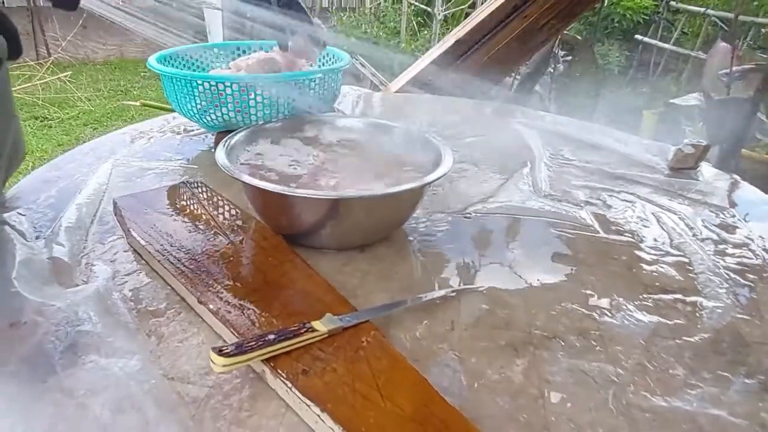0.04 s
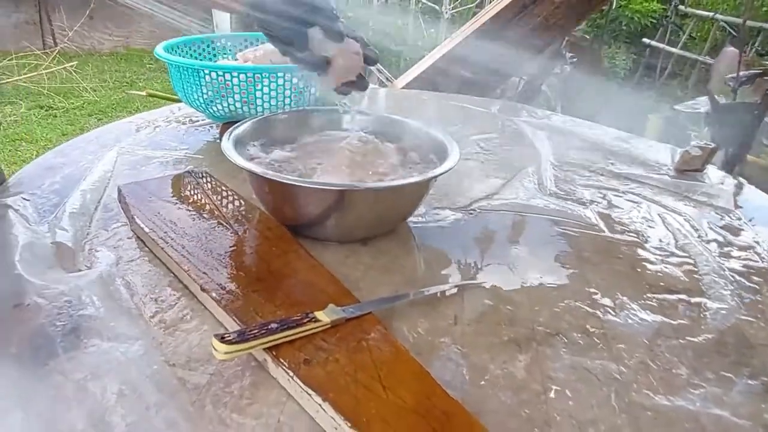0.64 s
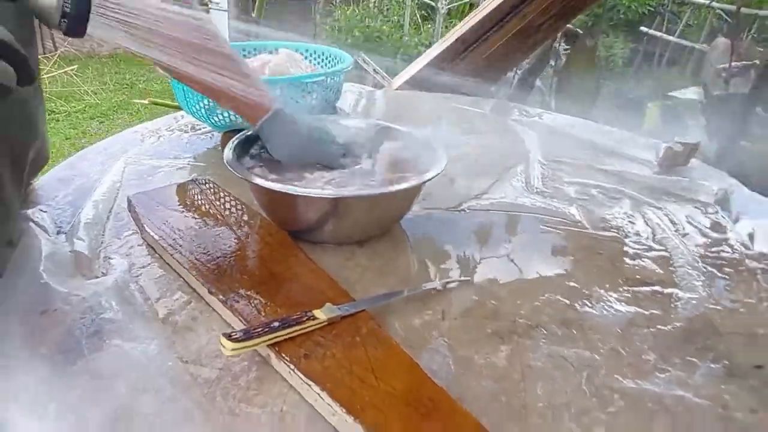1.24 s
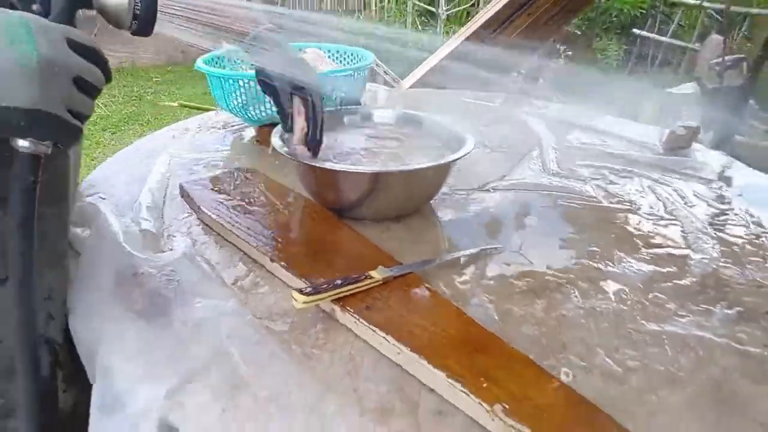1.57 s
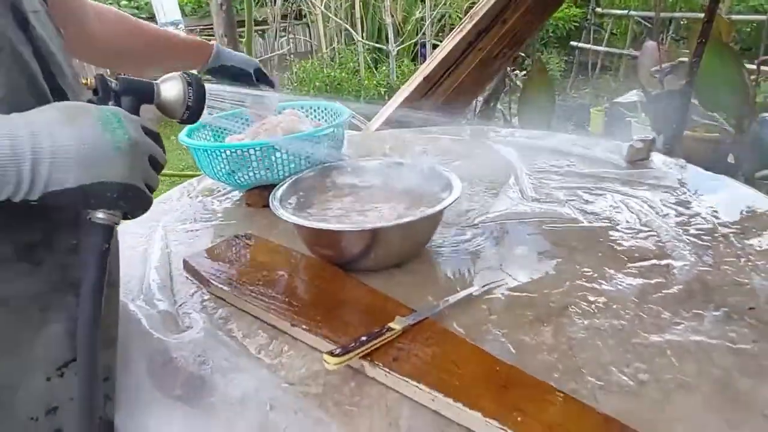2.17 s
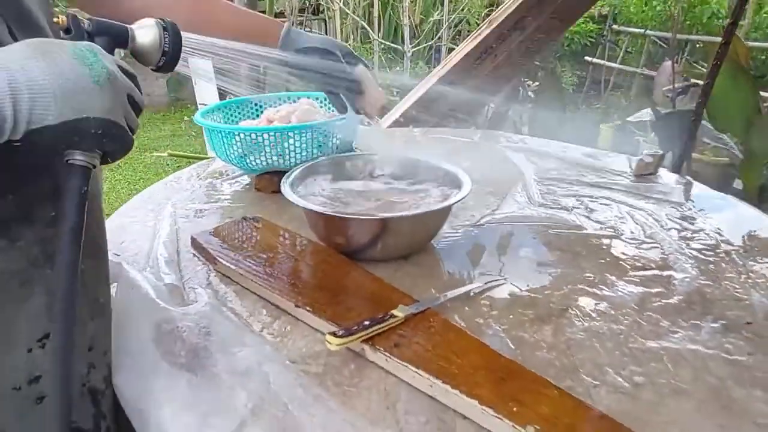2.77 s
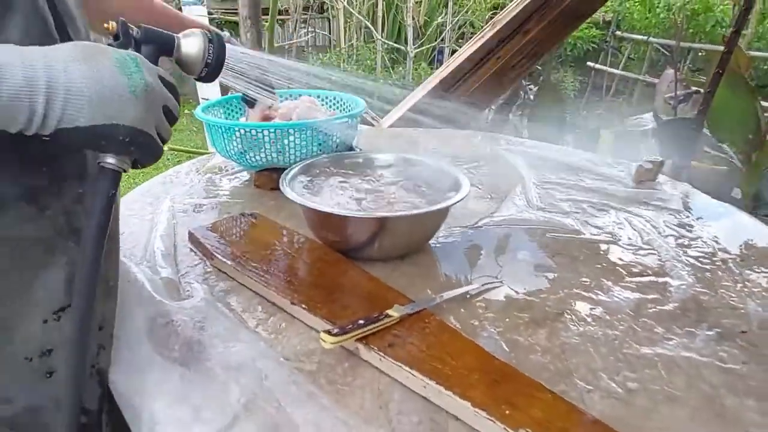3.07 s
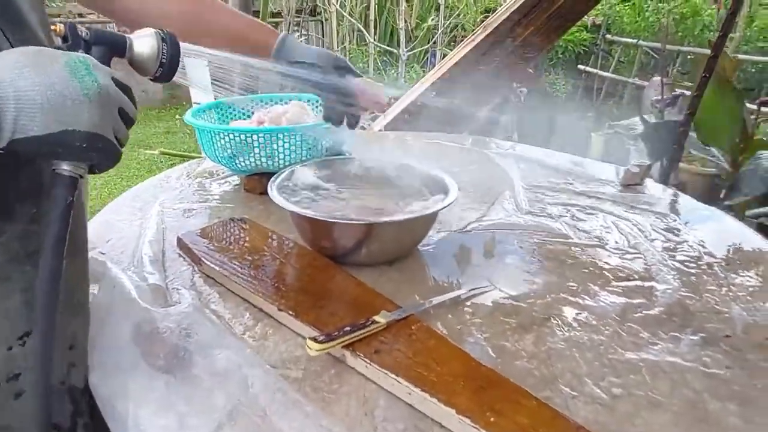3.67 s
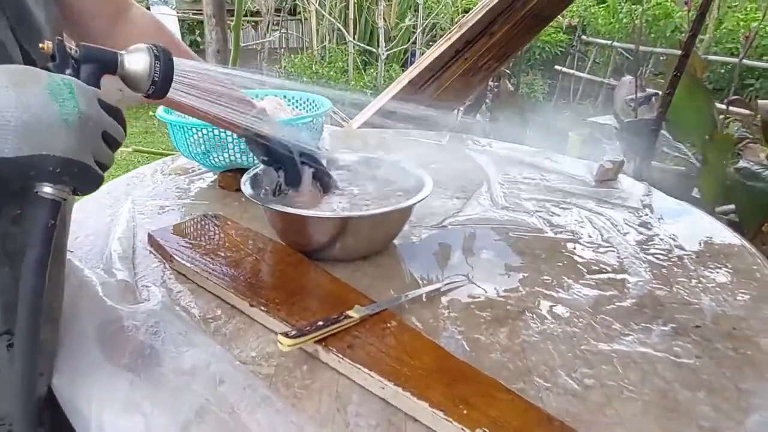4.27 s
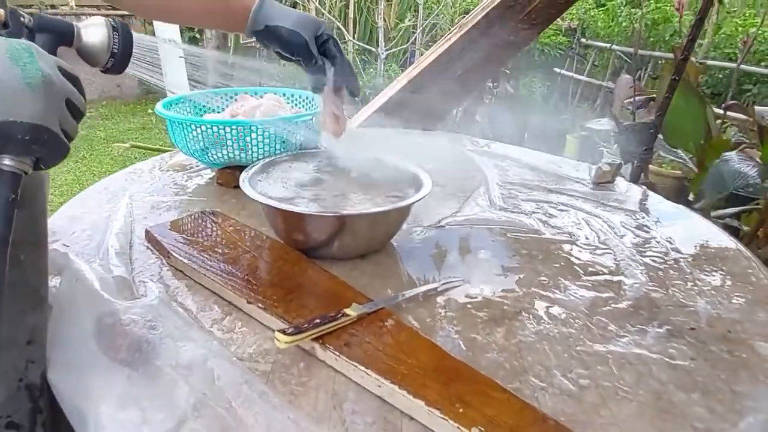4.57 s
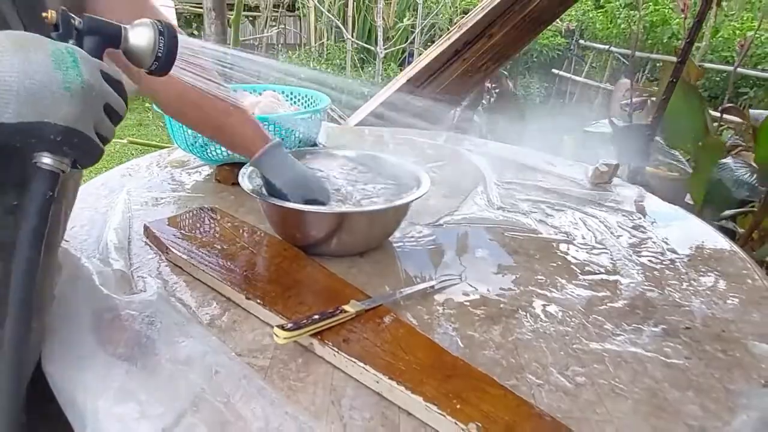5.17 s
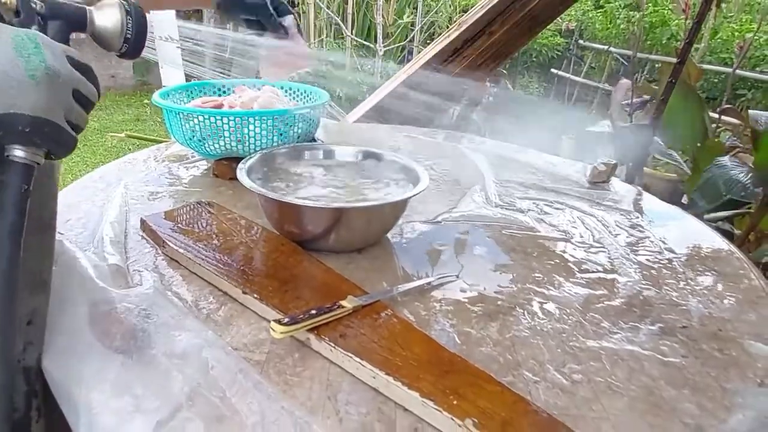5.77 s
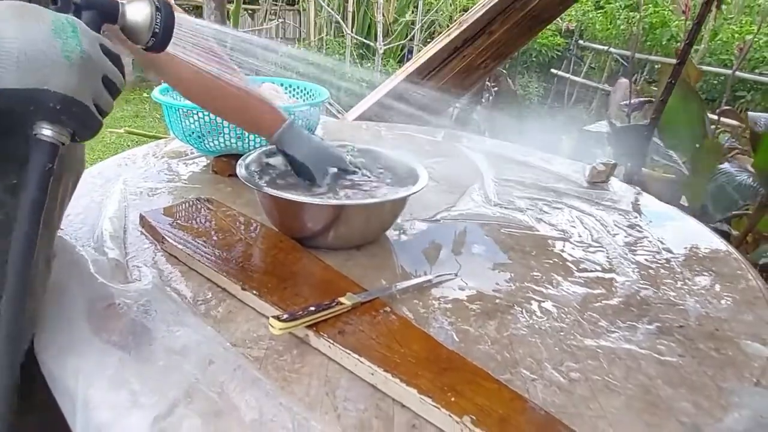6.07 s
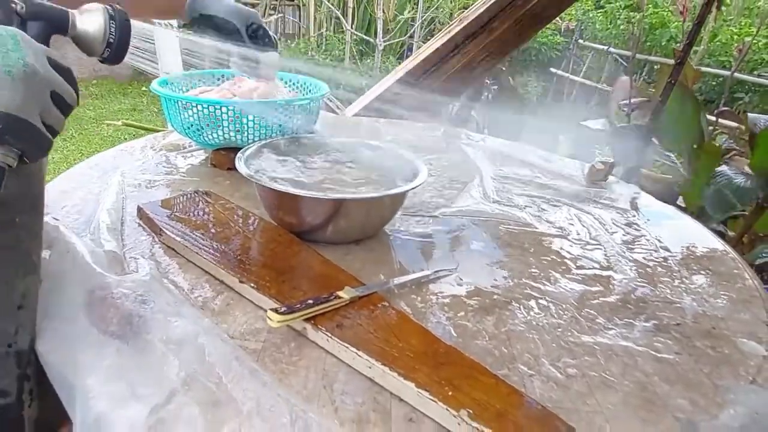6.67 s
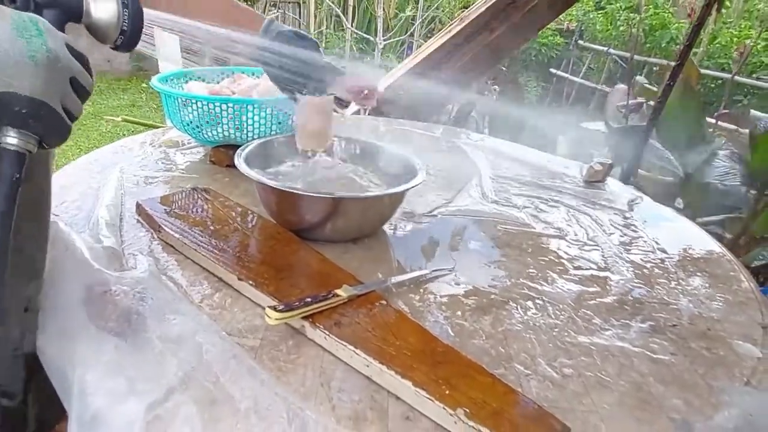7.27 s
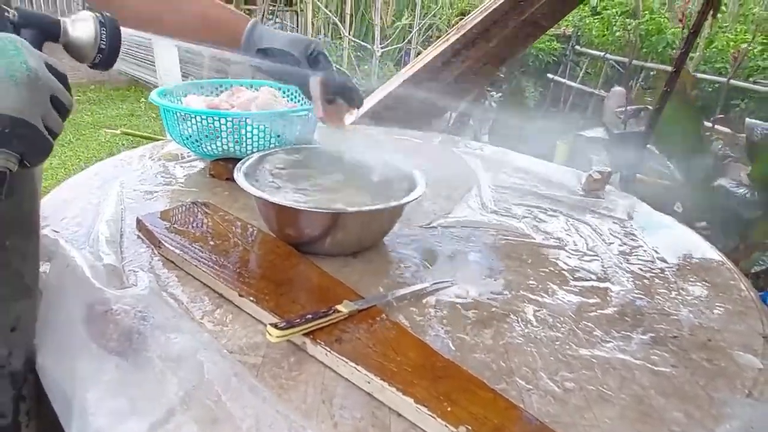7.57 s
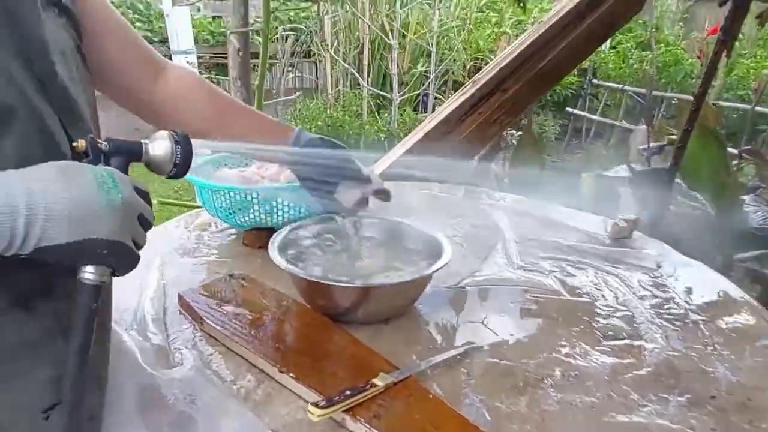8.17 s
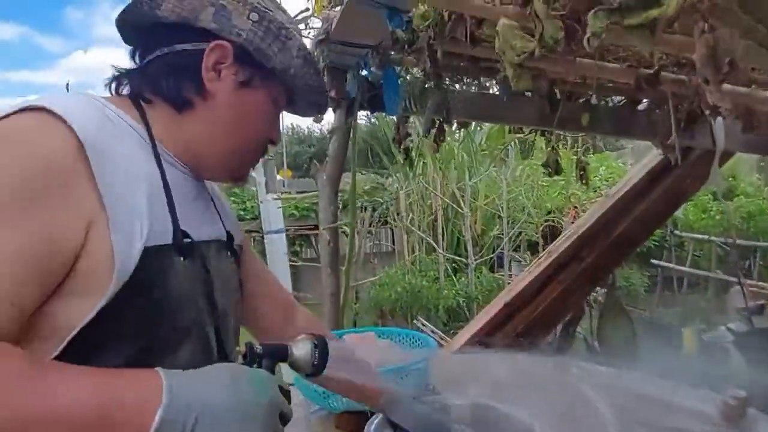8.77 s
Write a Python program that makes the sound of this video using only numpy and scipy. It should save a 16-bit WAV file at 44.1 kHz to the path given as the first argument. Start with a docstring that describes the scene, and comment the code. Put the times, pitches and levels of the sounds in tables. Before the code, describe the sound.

A garden hose sprays without a break onto a wet outdoor table and a steel bowl of water, drumming, splattering and hissing close by. About once a second a gloved hand dips into the bowl with a bubbly slosh, then holds a fish fillet in the jet, so the drumming drops and a fine mist remains. The bowl rings faintly and gulps. Wind gusts buffet the microphone, with a last rumble near the end.

```python
"""From the start, a garden hose drums on a wet outdoor table and splatters in the film of water.
Soon a gloved hand dips into a steel bowl, sloshing up bubbles, then rinses a fish fillet in the jet:
the drumming drops and fine mist is left. This repeats about once a second while the bowl rings and
gulps and gusts buffet the two microphone ports (its openings). Near the end the microphone tilts
away, dulling the finest hiss, as a last gust rumbles."""
import sys
import numpy as np
from scipy import signal
from scipy.fft import rfft, irfft, next_fast_len
from scipy.io import wavfile

SR = 44100
rng = np.random.default_rng(int(sys.argv[2]) if len(sys.argv) > 2 else 0)


def digitize_waveform(pressure):
    """Quantize a signal to 16-bit integers and store it at the path in sys.argv[1].

    Rows of a 2-D input are taken as channels; values are limited to [-1, 1].
    """
    field = np.atleast_2d(pressure).T
    bounded = np.clip(field, -1, 1)
    quanta = np.round(bounded * 32767).astype(np.int16)
    wavfile.write(sys.argv[1], SR, quanta)


N = 398663

# Levels in the tables are relative. "Side" is left minus right: above 0 leans left.
# the free jet as the nozzle wanders over the table: t/s, drumming/dB, splatter/dB, mist/dB
FREE_JET = [(0, -40.5, -35.5, -39.5), (.28, -39.5, -35, -45), (.53, -43, -38.5, -44),
            (1.05, -43, -34, -37.5), (1.4, -44, -38.5, -39), (2.1, -41.5, -33.5, -38),
            (2.6, -43.5, -39.5, -46), (3.2, -44, -37, -42.5), (3.9, -43, -36.5, -38),
            (4.59, -44.5, -38.5, -38.5), (5.17, -41.5, -39, -39.5), (5.6, -43, -35.5, -44),
            (6.0, -43, -38, -40.5), (6.75, -40.5, -38.5, -40), (6.95, -45, -38, -44),
            (7.78, -42, -37, -41.5), (8.5, -42.5, -35.5, -44.5), (9.04, -49.5, -37, -42)]
# the hand holds a fillet in the jet: t in/s, t out/s, time to clear/s, drumming lost/dB,
# splatter lost/dB, mist gained/dB, lull in the mist just before/dB
FILLET_RINSES = [(0.516, 0.817, .02, 6.5, 2.5, 1, -1), (1.134, 1.232, 0.049, 5.5, -0.5, 0, 0),
                 (1.613, 1.92, 0.034, 7.5, 1.5, 1.5, 8), (2.58, 2.9, 0.022, 8.5, 2, 3.5, -2),
                 (3.477, 3.744, 0.11, 9, 2.5, 3, 8), (4.31, 4.725, 0.1, 7.5, 2, 1, -2),
                 (5.28, 5.672, 0.12, 9.5, 5.5, 3.5, 0.5), (6.247, 6.58, 0.19, 11, 0.5, 3.5, 4),
                 (7.11, 7.624, 0.48, 4.5, 1.5, 1.5, -4), (8.127, 8.476, 0.28, 9.5, 3.5, 3.5, -1)]
# the jet falls squarely into the bowl: t/s, length/s, drumming gained/dB, splatter gained/dB
JET_SURGES = [(.05, 0.044, 1.5, 0), (.27, .04, 1, 0.5), (0.863, 0.058, 0.5, 1.5), (1.113, 0.036, 2.5, 3),
              (1.31, 0.13, 1, 3.5), (1.54, .06, 3, -2), (2.127, .06, -1.5, 0), (2.33, 0.046, 1.5, -1),
              (2.423, 0.071, 1.5, 2), (3.064, .14, 1.5, 3.5), (3.41, 0.083, 1.5, -1.5),
              (3.863, .05, 2, 0.5), (4.03, .05, -1, 2.5), (4.252, 0.07, 5.5, 1.5), (4.87, 0.11, -0.5, 4.5),
              (5.06, 0.065, 1, 3.5), (5.136, 0.074, 2.5, 2.5), (5.834, .08, 4.5, 2), (5.906, .04, 5, 2),
              (6.004, 0.082, 5.5, 1), (6.68, 0.053, 0.5, 2.5), (7.77, .1, 2, 5.5), (8.045, .06, 1, -3),
              (8.832, 0.074, 3, 3)]
# the jet catches glove or fillet squarely and spits mist: t/s, length/s, level/dB
MIST_SPITS = [(.27, .08, -38.5), (.6, 0.06, -38), (0.782, 0.068, -38.5), (2.403, .07, -38),
              (2.99, .06, -41), (3.273, .08, -37.5), (3.503, 0.045, -37.5), (4.87, .07, -39),
              (5.346, 0.087, -38.5), (5.61, .06, -39), (6.408, .05, -37), (6.768, .07, -36.5),
              (7.274, 0.055, -33.5), (7.412, .04, -36.5), (7.53, 0.051, -33.5), (7.754, 0.09, -41),
              (8.166, 0.073, -34.5), (8.62, 0.13, -39)]
# what the jet hits: t/s, table's boom/dB, water's hollow ring/dB, steel wall/dB, slap on the top/dB
SURFACES_HIT = [(0, 2, -1, -1.5, 1.5), (1.0, 3, -1.5, 1, -0.5), (2.2, 1, 0.5, 1, -0.5), (3.0, 1.5, 3, 3, 1),
                (4.2, -0.5, -2, 1, 0), (5.1, -3.5, 3, 2, 1.5), (6.0, 0.5, 2, 1, 0.5), (6.8, 2, 3, 0.5, 1),
                (7.9, -4.5, -1, 0, -1.5), (8.4, -6, -7, -5.5, -1.5), (9.04, -17, -9, 6.5, 4)]
# where the spray lands: t/s, splatter side/dB, splatter treble/dB, mist side/dB, mist treble/dB
SPRAY_AIM = [(0, 1, 1, 5.5, -3), (1.08, 0, -2, 4.5, -2.5), (1.62, 4, 0, 0, -0.5), (2.2, 1.5, 2, 1.5, 1.5),
             (3.0, 3.5, 3, -1, 1), (3.55, 0, 1, 2, 0.5), (4.8, 2, 0.5, 3, -3), (5.55, 1.5, -2, 2, -1),
             (6.45, 1.5, 0, 3, -3), (6.75, 1.5, 4.5, 4, -2.5), (7.02, 1.5, -3.5, 3.5, -4),
             (7.56, 0, 0, 2.5, -1.5), (7.83, 2, 0, -3, 3), (8.12, 5.5, -2, -2, -1),
             (8.45, 1.5, -9, -0.5, 1), (9.04, 1, -7, -0.5, 0)]
# ringing notes of the wet table, then its low booming ones: f/Hz, width/Hz, level/dB
TABLE_RINGS = [(840, 126, -2.5), (988, 137, 1), (1503, 137, -3), (1890, 140, -1.5)]
TABLE_BOOM = [(232.4, 34, -2), (386, 105, -19), (727, 110, -10.5)]
# tone of heavy drops, of drops bursting in the film, and of mist: f/Hz, level/dB
THUD_TONE = [(150, -18), (450, -44), (700, -22), (1100, -3), (2000, -11), (3200, -3), (6000, -17),
             (12000, -49)]
SPLATTER_TONE = [(150, -17.5), (450, -13), (700, -4), (1200, -13), (1700, -9), (2300, 0), (3200, 1.5),
                 (5000, 0.5), (7000, -3.5), (10000, -10.5), (16000, -10)]
MIST_TONE = [(500, -50), (2000, -16), (5000, 0.5), (9000, 1.5), (12000, 3.5), (16000, 2)]
# echoes off the roof, the posts and an apron: delay/s, level/dB
NEAR_ECHOES = [(.0023, -18.5), (.0064, -13), (0.0118, -13.5), (0.0185, -17.5)]
# the hand goes into the bowl: middle t/s, length/s, level/dB
HAND_DIPS = [(0.329, 0.2, -47), (1.286, 0.22, -53), (2.452, 0.21, -44.5), (3.3, 0.12, -57),
             (4.263, 0.18, -59), (5.103, 0.13, -45), (5.385, 0.17, -58), (6.209, 0.16, -53),
             (7.027, 0.21, -43), (8.001, .2, -54)]
# hollow gulps of the churned water: middle t/s, length/s, f/Hz, level/dB
WATER_GULPS = [(0.94, 0.15, 2310, -46), (2.044, 0.085, 330, -53), (2.186, 0.074, 338, -55.5),
               (3.326, 0.041, 2260, -39), (4.033, .03, 1580, -44), (4.429, 0.021, 1695, -41),
               (5.043, 0.013, 1286, -35.5), (5.065, 0.015, 1356, -40), (5.341, 0.024, 2460, -38),
               (5.918, 0.022, 1320, -41), (6.079, 0.025, 1274, -41), (6.147, .025, 1265, -48),
               (6.22, 0.034, 1220, -51)]
# gusts at the ports: start t/s, length/s, level/dB, side/dB
WIND_GUSTS = [(.88, 0.23, -53, -6), (1.33, 0.35, -52, -3), (1.733, 0.093, -46.5, 4),
              (3.056, 0.25, -51.5, 9), (3.685, 0.1, -43, 13), (3.818, 0.037, -41.5, 20),
              (3.908, 0.062, -45, 17), (4.104, 0.22, -43.5, -4), (4.327, 0.16, -40.5, 11),
              (4.527, 0.081, -47, 11), (4.63, 0.14, -50.5, -4), (4.966, 0.37, -58, 8),
              (5.32, 0.14, -47.5, -9), (5.65, 0.19, -59, -8), (6.14, 0.23, -53, 15),
              (6.39, 0.427, -41, -12.5), (6.864, 0.5, -48.5, -3), (7.384, 0.15, -54, 11),
              (7.767, 0.26, -57, 14), (8.16, 0.28, -49.5, 1), (8.38, .7, -39.5, -15)]
# rumble of the air at each port, deeper on the right: f/Hz, left level/dB, right level/dB
WIND_TONE = [(15, -19, -15), (30, -10, -7), (58, 0.5, 2.5), (80, -0.5, -0.5), (118, 1, -1), (186, -8, -12),
             (257, -7, -12.5), (325, -21.5, -23.5), (450, -22.5, -31.5), (900, -63, -63)]
# single puffs of air: t/s, level/dB, side/dB
AIR_PUFFS = [(1.027, -30, -10.0), (1.531, -33.5, 2), (1.76, -24, 17), (3.22, -29, 15), (3.689, -36, 13.5),
             (3.768, -25, 14), (3.949, -28, 27), (4.176, -30, 14.5), (4.364, -21.5, 12.5), (4.438, -35, 17),
             (4.551, -26.5, 22), (5.439, -38, -22), (6.163, -18, 16), (6.54, -26, -20), (6.71, -20, -25),
             (6.78, -40, -3), (8.174, -30.5, 23), (8.404, -21.5, -19), (8.581, -32, -22.0),
             (8.699, -30, -13)]
# faint rumble of the yard: f/Hz, level/dB
YARD_TONE = [(20, -21), (60, -20), (120, 16), (180, -7), (250, 7.5), (350, -4), (1000, -15), (8000, -30)]
# how each microphone port colours the sound: f/Hz, level/dB
LEFT_PORT_TONE = [(200, -0.5), (600, -1.5), (1270, 2.5), (2000, 4), (2400, -4.5), (3400, -6.5),
                  (5100, -3.5), (6000, -3.5), (6400, -5), (7600, -9.5), (9500, -4.5), (12000, -3.5),
                  (14700, 3), (17000, 2)]
RIGHT_PORT_TONE = [(200, -1), (800, -3), (1270, 3.5), (2200, 6), (2800, 3), (3450, 3), (4350, -2),
                   (5700, 3.5), (7000, 4), (8700, -6), (10600, 7), (12800, 2), (14000, 2.5), (17000, -12)]

LAG_S, LAG_SPREAD_S = 0.00022, .00008  # the left port hears later: spray lands in a patch to the right
ENTER_S = 0.051  # time the hand takes to cut into the jet
LULL_LEAD_S, LULL_S = 0.088, 0.056  # just before, it is down in the bowl and less mist flies
RING_DB, RING_FOLLOWS = -47.5, 0.85  # the bowl's base level; how much it follows the drumming
GUST_EDGE_S, BREEZE_DB = 0.059, -59.5  # rise and fall of a gust; the air between gusts
TILT_S, TILT_TAKES_S, TILT_HZ, TILT_DB = 8.41, .1, 12000, -5.5  # the microphone tilts away
CUTOFF_HZ = 15770


def jet_levels(waver_db):
    """Levels of drumming, splatter and mist: the hand shields the table and turns the jet to mist."""
    drum_db, splatter_db, mist_db = in_time(FREE_JET)
    for enters, leaves, clear_s, drum_loss_db, splatter_loss_db, mist_gain_db, lull_db in FILLET_RINSES:
        blocked = plateau(enters, leaves, ENTER_S, clear_s)
        drum_db -= drum_loss_db * blocked
        splatter_db -= splatter_loss_db * blocked
        mist_db += mist_gain_db * blocked
        mist_db -= lull_db * bump(enters - LULL_LEAD_S, LULL_S)
    for s, length, drum_gain_db, splatter_gain_db in JET_SURGES:
        surge = bump(s, length / 2)
        drum_db += drum_gain_db * surge
        splatter_db += splatter_gain_db * surge
    spit_power = sum(from_db(db) ** 2 * bump(s, length / 2) for s, length, db in MIST_SPITS)
    mist_db = 10 * np.log10(from_db(mist_db) ** 2 + spit_power)
    return drum_db + waver_db * drift(15), splatter_db, mist_db


def drumming(level_db, boom_db, hollow_db, slap_db, gain_db):
    """Heavy drops at full speed set the table and the water in the bowl ringing briefly."""
    hits = drops(per_s=5000, size_db=2.5, wash_db=-5.5)
    hollow = from_db(hollow_db + 1.0) * resonance(hits, hz=1280, width_hz=104)
    slap = from_db(slap_db) * resonance(hits, hz=2255, width_hz=400)
    boom = from_db(boom_db) * ringing_notes(hits, TABLE_BOOM)
    rings = ringing_notes(hits, TABLE_RINGS) + hollow + slap + boom
    thud = colour(drops(per_s=4500, size_db=3.0, wash_db=-17), THUD_TONE)
    return rms_one(rings + thud) * from_db(level_db + gain_db)


def splatter(level_db, side_db, treble_db, gain_db, flutter_db):
    """Drops burst in the film of water, in uneven clusters."""
    bursts = colour(drops(per_s=9000, size_db=2.5, wash_db=5.0), SPLATTER_TONE)
    bursts = treble(rms_one(bursts), hz=5200, db=treble_db)
    return bursts * from_db(level_db + gain_db + flutter_db * drift(17.4)) * pan(side_db)


def mist(level_db, side_db, treble_db, gain_db, flutter_db):
    """The nozzle's thin jets break into tiny droplets that fizz on everything they meet."""
    fizz = colour(drops(per_s=14000, size_db=2.0, wash_db=-7.0), MIST_TONE)
    fizz = treble(rms_one(fizz), hz=11600, db=treble_db)
    return fizz * from_db(level_db + gain_db + flutter_db * drift(36)) * pan(side_db)


def drops(per_s, size_db, wash_db):
    """Drops click at random, each with its own size and lag; the tiniest merge into a wash of hiss."""
    sizes = from_db(size_db * np.minimum(rng.exponential(1, N), 6))
    signs = rng.choice([-1, 1], N)
    right = sizes * signs * (rng.random(N) < per_s / SR)
    lags = np.round(SR * (LAG_S + LAG_SPREAD_S * rng.standard_normal(N))).astype(int)
    left = np.bincount((np.arange(N) + lags) % N, right, N)
    wash = from_db(wash_db) * rng.standard_normal((2, N))
    return rms_one(rms_one(np.array([left, right])) + wash)


def froth(level_db, gain_db, low_hz, high_hz, cycles, size_db, count=2500):
    """The jet beats small bubbles into the water all the time."""
    when, pitch, size = rng.random((count, 3)).T
    hz = low_hz * (high_hz / low_hz) ** pitch
    foam = bubbles(when * N / SR, hz, from_db(size_db * size), cycles)
    return rms_one(foam) * from_db(level_db + gain_db)


def bubbles(when, hz, gain, cycles, rise=0.017):
    """Each air bubble rings, fades and rises in pitch as it surfaces."""
    t = np.arange(SR // 60) / SR
    age = t * hz[:, None] / cycles
    fade = np.exp(-age) * (1 - t / t[-1])
    rings = gain[:, None] * fade * np.sin(2 * np.pi * hz[:, None] * t * (1 + rise * age))
    lags = LAG_S + LAG_SPREAD_S * rng.standard_normal(len(when))
    ports = []
    for arrival_s in (when + lags, when):
        starts = np.maximum(arrival_s * SR, 0).astype(int)
        samples = starts[:, None] + np.arange(len(t))
        ports.append(np.bincount(samples.ravel(), rings.ravel(), N)[:N])  # add up all the bubbles
    return np.array(ports)


def with_echoes(x, wander_s):
    """Nearby surfaces reflect the sound; the paths shift as the jet moves, so the tone swirls."""
    n, out = np.arange(N), x.copy()
    for delay_s, db in NEAR_ECHOES:
        for side, port in enumerate(x):
            delay = SR * (delay_s + wander_s * drift(1))
            out[side] += from_db(db) * np.interp(n - delay, n, port, left=0)
    return out


def steel_ring(drum_db, wall_db, hz, width_hz, flare_db):
    """The bowl's wall, damped by the water in it, rings with the drumming and flares up briefly."""
    ring = resonance(drops(per_s=3000, size_db=3.0, wash_db=1.0), hz, width_hz)
    ring *= from_db(flare_db * drift(5.9))
    swing_db = RING_FOLLOWS * (drum_db - drum_db.mean())
    return rms_one(ring) * from_db(RING_DB + wall_db + swing_db)


def sloshing(low_hz, high_hz, cycles, size_db, count=70):
    """Each dip of the hand traps a cloud of larger bubbles."""
    out = np.zeros((2, N))
    for s, length, db in HAND_DIPS:
        when, pitch, size = rng.random((count, 3)).T
        hz = low_hz * (high_hz / low_hz) ** pitch
        cloud = bubbles(s + length * (when - .5), hz, from_db(size_db * size), cycles)
        strength = np.sqrt(np.sum(cloud ** 2) / (2 * length * SR))
        out += from_db(db) * cloud / strength
    return out


def gulps(width_hz, gain_db):
    """The jet churns the water and makes one hollow note swell for a moment."""
    out = np.zeros((2, N))
    for s, length, hz, db in WATER_GULPS:
        stir = rng.standard_normal(SR // 4)
        t = (np.arange(len(stir)) - len(stir) // 2) / SR
        swell = resonance(stir, hz, width_hz) * np.exp(-(2 * t / length) ** 2)
        strength = np.sqrt(np.sum(swell ** 2) / (length * SR))
        for side, lag in enumerate([LAG_S, 0]):
            at = int((s + t[0] + lag) * SR)
            out[side, at:at + len(t)] += from_db(db + gain_db) * swell / strength
    return out


def wind(gain_db, lump_db):
    """Swirls of air rumble unevenly at each port, in gusts over a light breeze."""
    power = from_db(BREEZE_DB) ** 2
    for s, length, db, side_db in WIND_GUSTS:
        gust = from_db(db) * plateau(s, s + length, GUST_EDGE_S, GUST_EDGE_S)
        power = power + (gust * pan(side_db)) ** 2
    air = rng.standard_normal((2, N)) + 0.41 * rng.standard_normal(N)  # a little reaches both ports
    hz, *port_db = np.transpose(WIND_TONE)
    swirls = np.array([colour(flow, np.column_stack([hz, db])) for flow, db in zip(air, port_db)])
    lumps = from_db(lump_db * np.array([drift(33), drift(21)]))
    return rms_one(swirls * lumps) * from_db(gain_db) * np.sqrt(power)


def puffs(typical_hz, swell_s, dull_hz, gain_db):
    """A lone swirl of air gives a short, dull thump that sinks in pitch as it passes."""
    out, t = np.zeros((2, N)), np.arange(SR // 10) / SR
    for s, db, side_db in AIR_PUFFS:
        start_hz = typical_hz * (1 + rng.normal(0, 0.32, (2, 1)))
        cycles = start_hz * t / np.sqrt(1 + t / swell_s)
        thump = t / swell_s * np.exp(1 - t / swell_s) * np.sin(2 * np.pi * cycles)
        at = int(s * SR)
        out[:, at:at + len(t)] += from_db(db + gain_db) * thump * pan(side_db)
    return signal.sosfilt(signal.butter(4, dull_hz, fs=SR, output="sos"), out)


def yard(level_db):
    """The yard rumbles faintly and steadily behind everything."""
    noise = rng.standard_normal((2, N)) + rng.standard_normal(N)
    return from_db(level_db) * rms_one(colour(noise, YARD_TONE))


def from_db(db):
    """Turn decibels into a number to multiply by."""
    return 10 ** (np.asarray(db) / 20)


def rms_one(x):
    """Scale a sound so its average strength (rms) is 1."""
    return x / np.sqrt(np.mean(x ** 2) + 1e-20)


def pan(left_db):
    """Gains that make the left channel left_db louder than the right."""
    gains = from_db(np.array([[.5], [-.5]]) * left_db)
    return gains / np.sqrt(np.mean(gains ** 2, axis=0))


def in_time(rows):
    """Join a table's points with straight lines: one curve for each column after the time."""
    s, *columns = np.transpose(rows)
    return [np.interp(np.arange(N) / SR, s, column) for column in columns]


def plateau(start, end, rise_s, fall_s):
    """Rise to 1, hold and fall; half way at start and end."""
    corners = np.sort([start - rise_s / 2, start + rise_s / 2, end - fall_s / 2, end + fall_s / 2])
    return np.interp(np.arange(N), corners * SR, [0, 1, 1, 0])


def bump(s, half_s):
    """A smooth hill of height 1 around a moment."""
    out = np.zeros(N)
    near = np.arange(max(int((s - 3 * half_s) * SR), 0), min(int((s + 3 * half_s) * SR), N))
    out[near] = np.exp(-((near / SR - s) / half_s) ** 2)
    return out


def drift(rate_hz):
    """A smooth random wobble of typical size 1; a higher rate wobbles faster."""
    step, warm_up = 40, 2000
    r = np.exp(-2 * np.pi * rate_hz * step / SR)
    noise = rng.standard_normal(N // step + warm_up + 2)
    slow = signal.lfilter([1], [1, -2 * r, r * r], noise)[warm_up:]
    return np.interp(np.arange(N) / step, np.arange(len(slow)), rms_one(slow))


def colour(x, tone):
    """Make each frequency louder or softer by a table of f/Hz, level/dB."""
    size = next_fast_len(N + SR // 10)
    hz, db = np.transpose(tone)
    all_hz = np.maximum(np.arange(size // 2 + 1) * SR / size, 1)
    gains = from_db(np.interp(np.log(all_hz), np.log(hz), db))
    return irfft(rfft(x, size) * gains, size)[..., :N]


def treble(x, hz, db):
    """Raise or lower everything above a frequency."""
    highs = signal.sosfiltfilt(signal.butter(4, hz, "high", fs=SR, output="sos"), x)
    return x + (from_db(db) - 1) * highs


def resonance(x, hz, width_hz):
    """Ring at one note; the narrower the width, the longer it rings."""
    r = np.exp(-np.pi * width_hz / SR)
    feedback = [1, -2 * r * np.cos(2 * np.pi * hz / SR), r * r]
    return signal.lfilter(np.array([1, 0, -1]) * (1 - r * r) / 2, feedback, x)


def ringing_notes(hits, notes):
    """Ring at several notes at once, every second one with its sign flipped."""
    return sum(from_db(db) * resonance(hits, hz, width_hz) * (-1) ** k
               for k, (hz, width_hz, db) in enumerate(notes))


def scene():
    """Spray, bowl and air over the faint rumble of the yard."""
    drum_db, splatter_db, mist_db = jet_levels(waver_db=0.5)
    splatter_side, splatter_treble, mist_side, mist_treble = in_time(SPRAY_AIM)
    boom_db, hollow_db, wall_db, slap_db = in_time(SURFACES_HIT)
    spray = drumming(drum_db, boom_db, hollow_db, slap_db, gain_db=4.0)
    spray += splatter(splatter_db, splatter_side, splatter_treble, gain_db=2.5, flutter_db=1.5)
    spray += mist(mist_db, mist_side, mist_treble, gain_db=4.0, flutter_db=1.3)
    spray += froth(splatter_db, gain_db=-8.0, low_hz=1598, high_hz=6044, cycles=33, size_db=27)
    bowl = steel_ring(drum_db, wall_db, hz=1690, width_hz=114, flare_db=1.8)
    bowl += sloshing(low_hz=1010, high_hz=3270, cycles=9.8, size_db=46)
    bowl += gulps(width_hz=20, gain_db=3)
    air = wind(gain_db=5.5, lump_db=4.0)
    air += puffs(typical_hz=209, swell_s=0.0036, dull_hz=352, gain_db=-2.0)
    background = yard(level_db=-62)
    return with_echoes(spray, wander_s=0.00034) + bowl + air + background


def record(dry):
    """The microphone tilts away near the end; each port colours the sound; the highest hiss is cut."""
    tilt = np.clip((np.arange(N) / SR - TILT_S) / TILT_TAKES_S + .5, 0, 1)
    heard = dry + tilt * (treble(dry, TILT_HZ, TILT_DB) - dry)
    ports = np.array([colour(heard[0], LEFT_PORT_TONE), colour(heard[1], RIGHT_PORT_TONE)])
    return signal.sosfilt(signal.ellip(12, .1, 80, CUTOFF_HZ, fs=SR, output="sos"), ports)


dry = scene()
out = record(dry)
digitize_waveform(out)
```